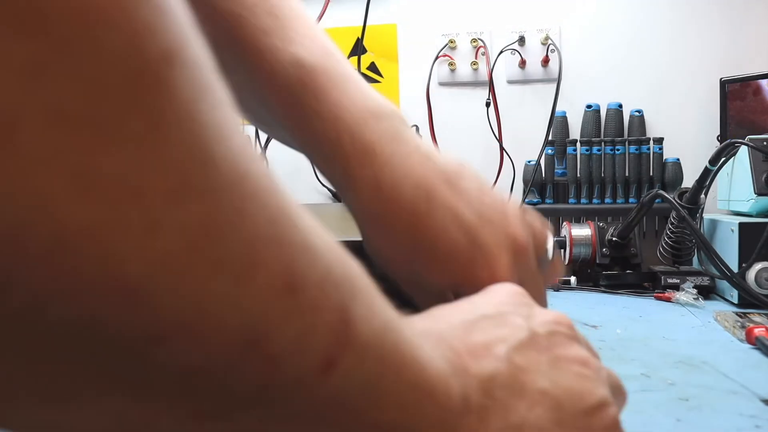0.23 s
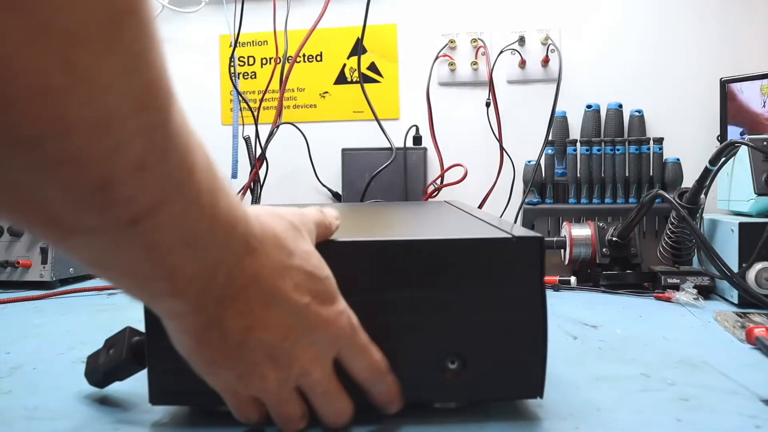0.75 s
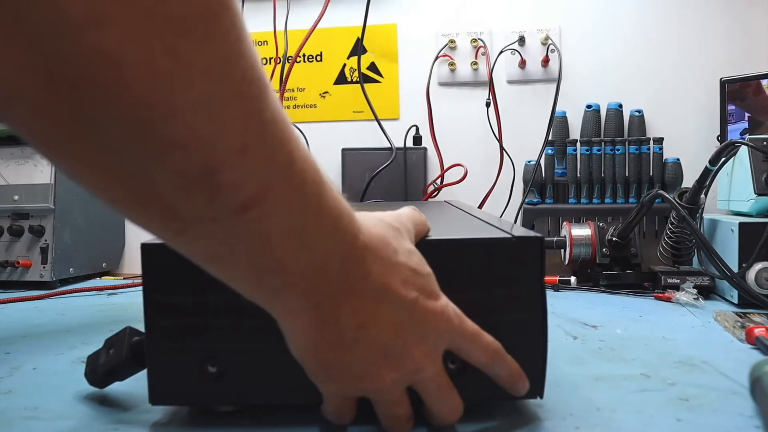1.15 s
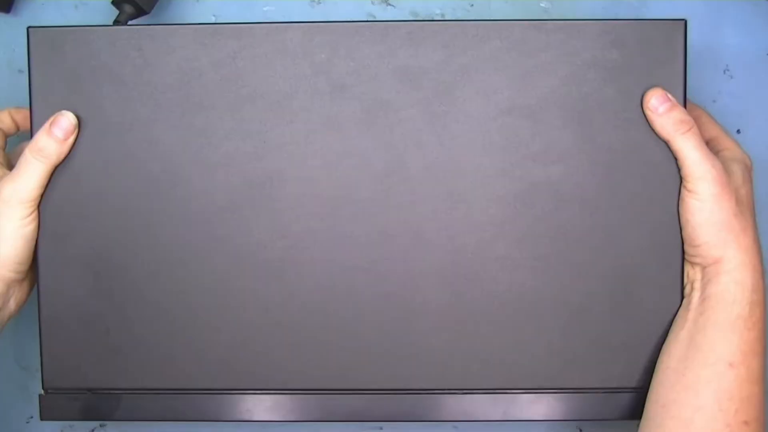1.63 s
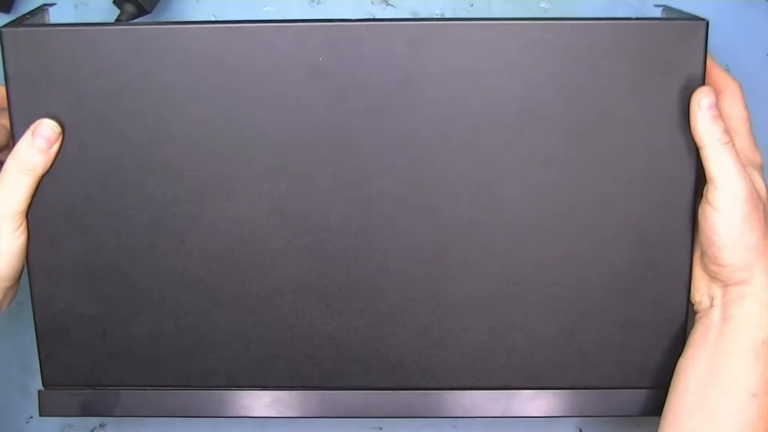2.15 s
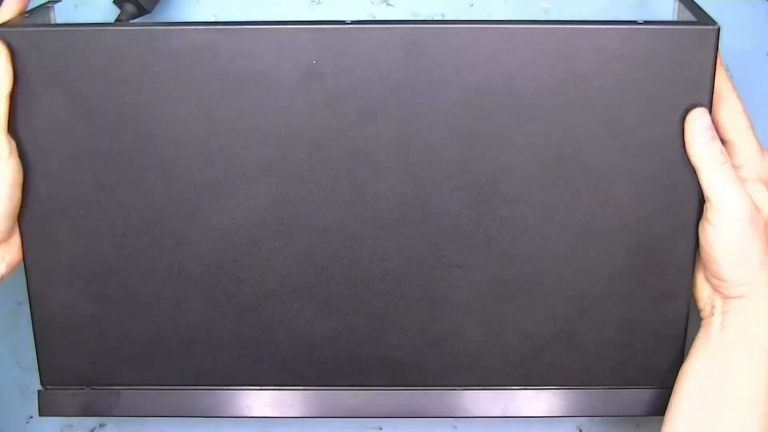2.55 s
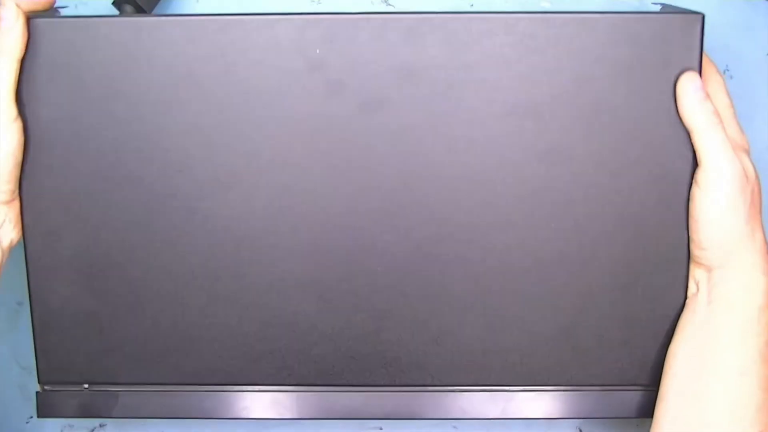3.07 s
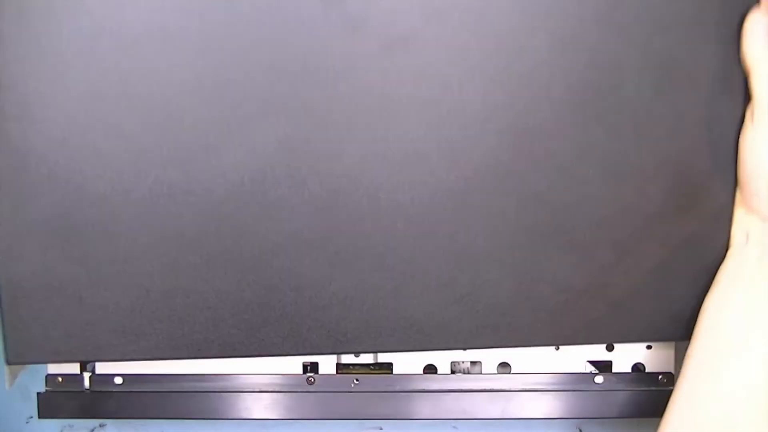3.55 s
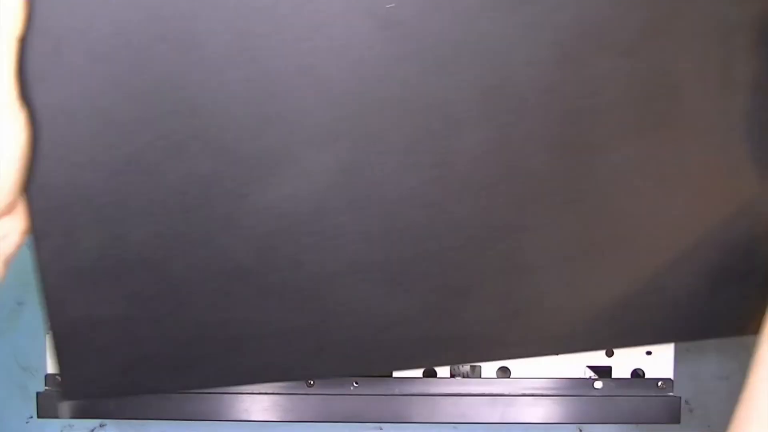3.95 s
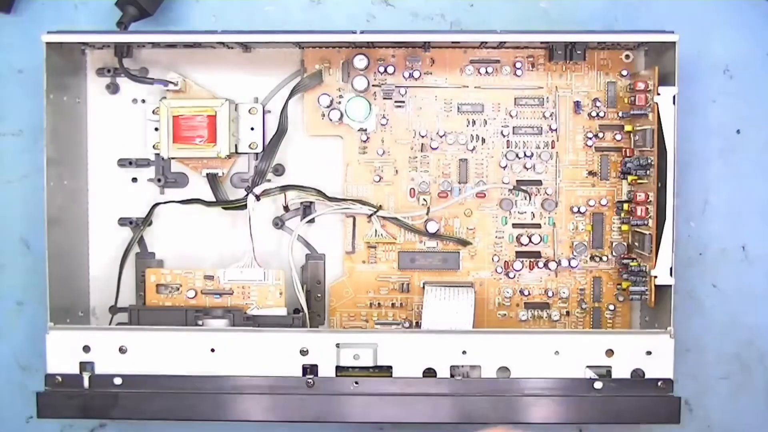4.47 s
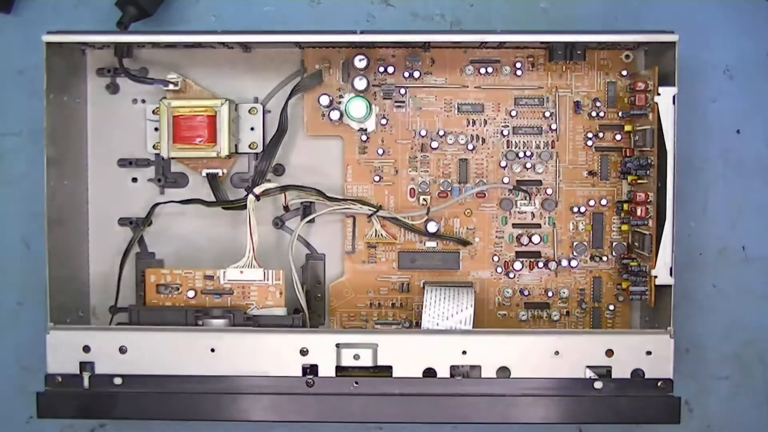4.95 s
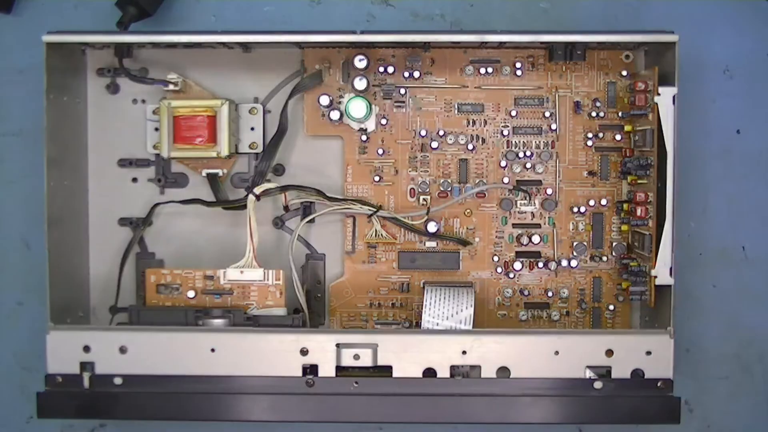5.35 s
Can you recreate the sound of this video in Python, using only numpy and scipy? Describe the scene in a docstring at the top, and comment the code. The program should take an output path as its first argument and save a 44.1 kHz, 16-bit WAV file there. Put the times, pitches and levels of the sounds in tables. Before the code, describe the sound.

A heavy metal-cased deck is dragged and knocked on a matted bench, its steel cover grates off in clangs, then lands with a clatter.

```python
"""A bench with a mat, heard close up: a cassette deck is dragged and turned, knocking as it goes.
Its steel cover grates and jerks free in clashes, is lifted away with a swish and set down with a clatter.
Rubbing is coloured noise or grit under swelling strokes, with harmonics for the judder and a gliding sine
for the zip. Blows are decaying sines over a noise wash. Hands murmur and squeak over a quiet room."""
import sys
import numpy as np
from scipy import signal
from scipy.fft import rfft, irfft, next_fast_len
from scipy.io import wavfile
from scipy.ndimage import map_coordinates

SR = 44100
rng = np.random.default_rng(int(sys.argv[2]) if len(sys.argv) > 2 else 0)


def unload_wav(signal):
    """Save mono or channel-first audio to the path in sys.argv[1] as 16-bit WAV at rate SR, clipped to [-1, 1]."""
    wavfile.write(
        sys.argv[1],
        SR,
        np.round(np.clip(np.atleast_2d(signal).T, -1, 1) * 32767).astype(np.int16),
    )


N = 247401
RING = SR * 3 // 5  # samples in one blow

# modes of the held cover, levels before trim and scatter: f/Hz, level/dB, t60/s at ring length 1
COVER_MODES = [(52, -25.5, .4), (93, 0, 0.27), (105, 7, 0.057), (112.6, 0.5, 0.61), (163, 3, 0.069),
               (175.1, -7.5, 0.47), (204, -2.5, 0.16), (298.6, 3.5, 0.51), (340.8, -4, 0.98),
               (417, 6, 0.22), (487, -3.5, 0.58), (485, -10.5, 0.083), (755, -21.5, 0.21),
               (848.6, -5.5, 0.46), (934, -7, 0.22), (1291, -26.5, 0.44), (1440, -2.5, 0.13),
               (1834, -5.5, 0.12), (2230, 5, 0.11), (2680, -3, 0.23), (3270, -17, 0.24),
               (3890, -13.5, 0.62), (4625, -17.5, 0.33), (5290, -4.5, 0.23), (5390, -2, 0.17),
               (6530, -0.5, 0.11)]
# ringing time of the steel sheet's wash at ring length 1: f/Hz, t60/s
STEEL_WASH_T60 = [(80, 0.065), (400, 0.44), (1500, 0.24), (4000, 0.11), (12000, 0.11)]
# colour of skin or cloth rubbing on the sheet: f/Hz, relative level/dB per Hz
BRUSH_TONE = [(290, -38), (500, -8), (906, -14.5), (974, -1.5), (1050, -8.5), (1670, -3), (2230, -5.5),
              (6140, -7.5), (11600, -17.5), (16000, -24)]


def amp(db):
    """Decibels to gain."""
    return 10 ** (np.asarray(db) / 20)


def unit(x):
    """Scaled to rms 1."""
    return x / np.sqrt(np.mean(x ** 2) + 1e-20)


def along(points, hz):
    """A (f/Hz, value) curve read on a log frequency axis."""
    f, value = np.transpose(points)
    return np.interp(np.log(hz + 1), np.log(f), value)


def level(rows):
    """Gain per sample from a (t/s, level/dB) curve, dropping to -140 dB after its last point."""
    return amp(np.interp(np.arange(N) / SR, *np.transpose(rows), right=-140))


def wobble(rate):
    """A smooth random curve with `rate` knots a second."""
    knots = rng.standard_normal(2000)
    return map_coordinates(knots, [np.arange(N) * rate / SR], mode="wrap")


def filtered(x, response):
    """x times a response of frequency, padded so that its tail does not wrap round."""
    m = next_fast_len(len(x) + 8192)
    spectrum = rfft(x, m) * response(np.fft.rfftfreq(m, 1 / SR))
    return irfft(spectrum, m)[:len(x)]


def coloured(x, tone):
    """x with a (f/Hz, level/dB) colour, at rms 1."""
    return unit(filtered(x, lambda hz: amp(along(tone, hz))))


def resonance(hz, centre_hz, width_hz):
    """Causal response of one mode, with a peak of 1."""
    return 1j * hz * width_hz / (centre_hz ** 2 - hz ** 2 + 1j * hz * width_hz)


def grit(rate, spread_db):
    """Tiny slips of random size at random moments, `rate` a second, under a wandering level."""
    slips = rng.random(N) < rate / SR
    return unit(slips * rng.standard_normal(N) * amp(spread_db * wobble(140)))


def strokes(rows):
    """Gain per sample of rubbing strokes that each swell to a peak and fade."""
    drop_db = 20  # swell and fade are the times taken to cover this
    roundness = 1.41  # 1 = pointed peak, 2 = bell
    t, power = np.arange(N) / SR, np.zeros(N)
    for peak_s, db, swell, fade in rows:
        away = np.minimum(np.maximum((peak_s - t) / swell, (t - peak_s) / fade), 5)
        power += amp(db - drop_db * np.abs(away) ** roundness) ** 2
    return np.sqrt(power)


def ring(modes, wash, wash_t60, modes_db, length, late_db, late_t60, free=1):
    """One blow: clear modes over a wash that dies at its own pace in each band and leaves a late ring."""
    t = np.arange(RING, dtype=np.float32) / SR
    hz, db, t60 = np.transpose(modes).astype(np.float32)[:, :, None]
    # each blow excites the modes a little differently
    strength = amp(db + modes_db + 2 * rng.standard_normal(hz.shape)).ravel()
    decay = np.exp(-t * np.float32(np.log(1000) / (length * free)) / t60)
    clear = strength @ (decay * np.sin(2 * np.pi * hz * t))
    noise = coloured(rng.standard_normal(RING), wash)
    f, s, z = signal.stft(noise, SR, nperseg=256)
    early = amp(-60 * s / (length * along(wash_t60, f)[:, None]))
    late = amp(late_db - 60 * s / (late_t60 * free))
    return clear + signal.istft(z * (early + late), SR, nperseg=256)[1][:RING]


def blows(rows, voice, rise, thump_db, body_db, bright_db):
    """Each contact drives the low, middle and high bands at levels of its own."""
    out, t = np.zeros(N + SR), np.arange(RING) / SR
    edges = [(180, "low"), ((180, 1000), "band"), (1000, "high")]  # Hz
    bands = [signal.butter(3, edge, kind, fs=SR, output="sos") for edge, kind in edges]
    for s, bright, thump, body, length in rows:
        build_up = 1 - np.exp(-t / max(rise(bright), 1e-4))
        blow = voice(s, max(length, .2)) * build_up
        levels = (thump + thump_db, body + body_db, bright + bright_db)
        for band, db in zip(bands, levels):
            part = signal.sosfilt(band, blow)
            # the level is that of the first 25 ms
            out[round(s * SR):][:RING] += amp(db) * part / np.std(part[:SR // 40])
    return out[:N]


def handling():
    """Hands on the case excite a low, wavering murmur of the panels, over steady room noise."""
    # how hard the hands work the case: t/s, murmur level/dB before its waver
    grip = [(0, -56), (.65, -64.5), (1.5, -61.5), (1.78, -46), (2.45, -50), (2.75, -46), (3.6, -56.5),
            (4, -78.5)]
    # colour of the room: f/Hz, relative level/dB per Hz
    room_tone = [(29, -36.5), (50, 2.5), (661, -9), (884, -6.5), (973, -14.5), (1960, -19), (2810, -15.5),
                 (3250, -20), (12300, -34.5), (13800, -34.5), (16000, -36.5)]
    murmur_tone = [(30, -14), (60, -10.5), (110, -9.5), (200, -18.5), (300, -9.5), (500, -20.0),
                   (900, -33.5), (3000, -42.5), (7000, -51.0), (15000, -61.5)]
    murmur = level(grip) * amp(2.2 * wobble(22)) * coloured(rng.standard_normal(N), murmur_tone)
    room = amp(-67) * coloured(rng.standard_normal(N), room_tone)
    return murmur + room


def drag():
    """Pushes over the mat: stick-slip gives a harmonic squeak, fine slips a hiss, the grain a sinking zip."""
    # judder, hiss (before trim) and zip strokes: peak t/s, level/dB, swell/s, fade/s
    judder = [(.01, -32.5, .1, .055), (.095, -35, .075, .09)]
    hiss_strokes = [(.02, -40, .1, .15), (.165, -36, .22, .06), (.245, -41.5, .1, .055),
                    (.32, -60, .05, .05)]
    zip_strokes = [(.228, -48, .045, .045)]
    # overtones of the judder: multiple, relative level/dB
    judder_tone = [(1, -7.5), (2, -14), (3, 3), (4, -14), (5, -10.5), (6, -2.5), (7, -16.5), (8, -3.5),
                   (9, -9), (10, -9), (11, -12), (12, -5.5), (13, -5.5), (14, -1.5), (15, -6), (16, -6.5),
                   (17, -15), (18, -15), (19, -14.5), (20, -10), (21, -10), (22, -22.5), (23, -22),
                   (24, -18.5)]
    # colour of the hiss: f/Hz, relative level/dB per Hz
    hiss_tone = [(25, -48), (60, -38), (150, 5), (300, 0), (600, 3.5), (1000, 3), (1600, 4), (2600, -2),
                 (4500, -0.5), (6500, -6), (8500, -15), (13000, -19), (16000, -34.5)]
    slip_hz = 276  # mean slips a second
    zip_peak_hz, zip_sag = 1180, 12000  # Hz at the stroke's peak, Hz per s

    cycles = np.cumsum(slip_hz * (1 + 0.004 * wobble(120))) / SR
    squeak = np.zeros(N)
    for k, db in judder_tone:
        flicker = amp(db + 2.5 * wobble(40))
        squeak += flicker * np.sin(2 * np.pi * (k * cycles + rng.random()))
    squeak = unit(squeak)
    hiss = coloured(grit(rate=22000, spread_db=0), hiss_tone)
    # the pitch sinks as the push slows
    zip_hz = np.maximum(zip_peak_hz - zip_sag * (np.arange(N) / SR - zip_strokes[0][0]), 0)
    rasp = np.sqrt(2) * np.sin(2 * np.pi * np.cumsum(zip_hz * (1 + .08 * wobble(400))) / SR)
    return strokes(judder) * squeak + strokes(zip_strokes) * rasp + amp(-0.5) * strokes(hiss_strokes) * hiss


def bumps():
    """Knocks of the deck and hands on the bench: short modes and wash, damped by the mat."""
    # knocks, levels before trim: t/s, click level/dB, thump level/dB, knock level/dB
    knocks = [(0.146, -33.5, -41.5, -20.5), (0.1651, -32, -42, -20), (0.3425, -53, -57, -35.5),
              (0.3862, -25, -23.5, -19), (0.4009, -12, -36.5, -12.5), (0.418, -16.5, -27.5, -23.5),
              (0.4314, -41.5, -28.5, -39), (0.8838, -51, -50, -52.5), (0.926, -43, -49, -67),
              (1.103, -34.5, -40, -32.5), (1.1597, -40.5, -42, -21.5), (1.204, -24.5, -23.5, -19),
              (1.2254, -8.5, -24, -13), (1.2659, -34.5, -49, -41), (1.423, -43.5, -64, -48.5),
              (1.6236, -39.5, -74, -53), (1.6877, -51.5, -49, -42), (1.721, -26.5, -34, -25.5),
              (4.6582, -46, -72, -47), (5.01, -50, -57.5, -56)]
    # modes of the deck on the bench, before trim and scatter: f/Hz, level/dB, t60/s at ring length 1
    bench_modes = [(100.6, 1.5, 0.12), (119, -9, 0.31), (178.3, 2.5, 0.079), (288, 4.5, 0.1),
                   (327.4, 2, 0.13), (514.6, -3, 0.081), (664, -17, 0.064), (887, -13.5, 0.078)]
    # dense higher modes: f/Hz, relative level/dB per Hz
    bench_wash = [(41, -41), (70, -22), (268, -2.5), (664, -1.5), (744, -6), (872, -2.5), (1050, -15.5),
                  (1760, -12.5), (1930, -14), (2220, -12), (2720, -12.5), (7060, -19.5), (16000, -52)]
    # their ringing time at ring length 1: f/Hz, t60/s
    bench_t60 = [(80, 0.06), (400, 0.15), (1500, 0.077), (10000, 0.077)]
    # slow build-up, then fast build-up with the click it must exceed: click level/dB, rise/s
    mat_rise = [(-21, 0.015), (-33.5, .0018)]
    (_, slow_s), (threshold_db, fast_s) = mat_rise
    mat_length = 0.73  # ring length factor on the damping mat

    def voice(s, length):
        return ring(bench_modes, bench_wash, bench_t60, modes_db=-0.5, length=length,
                    late_db=-53, late_t60=0.15)

    def rise(click_db):
        return fast_s if click_db > threshold_db else slow_s

    rows = [(*row, mat_length) for row in knocks]
    return blows(rows, voice, rise, thump_db=-5.5, body_db=-6.5, bright_db=-18.0)


def fingers():
    """Dry skin slips in fine grit on the painted steel; wavering sines make four faint squeaks."""
    # slides into a new grip, before trim: peak t/s, level/dB, swell/s, fade/s
    slides = [(.635, -67, .018, 0.073), (.725, -56, .025, .1), (.8, -63.5, .025, 0.074),
              (.955, -56.5, .035, 0.077), (1.08, -61, .025, 0.069), (1.535, -73, .03, .03),
              (1.66, -65, 0.027, 0.081), (5.2, -70.5, 0.18, .3)]
    # fingertip squeaks: middle t/s, half length/s, f/Hz, peak level/dB
    squeak_rows = [(4.27, .03, 2800, -60), (4.335, .03, 1170, -62), (4.41, .04, 1000, -61),
                   (4.81, .05, 1750, -63)]
    t = np.arange(N) / SR
    waver = np.cumsum(1 + 0.0132 * wobble(200)) / SR  # time that runs unevenly bends the pitch
    squeaks = np.zeros(N)
    for s, half, hz, db in squeak_rows:
        squeaks += amp(db) * np.exp(-((t - s) / half) ** 2) * np.sin(2 * np.pi * hz * waver)
    skin = coloured(grit(rate=12000, spread_db=4), BRUSH_TONE)
    return squeaks + amp(-1.5) * strokes(slides) * skin


def turn():
    """The feet hiss over the mat as the deck is swung round; one resonance of the case sings along."""
    # swings, before trim: peak t/s, level/dB, swell/s, fade/s
    swings = [(1.165, -36, 0.052, 0.081), (1.24, -33.5, 0.09, 0.049), (1.455, -49, 0.028, 0.032),
              (1.498, -40, 0.079, 0.0099)]
    # colour of the rub: f/Hz, relative level/dB per Hz
    turn_tone = [(59, -40), (100, -11), (234, -2), (502, -17.5), (950, -11), (1760, -5.5), (1950, -2.5),
                 (2170, -10.5), (3190, -20), (5080, -15), (8110, -16), (11900, -27), (16000, -40)]
    rub = coloured(grit(rate=34000, spread_db=3.0), turn_tone)
    rub = unit(filtered(rub, lambda hz: 1 + amp(-10) * resonance(hz, centre_hz=1944, width_hz=100)))
    return amp(0.5) * strokes(swings) * rub


def smeared(x, t60):
    """x spread by the countless short-lived modes of a sheet; they change as the contact travels."""
    hop = SR // 25
    t, out = np.arange(SR // 10) / SR, np.zeros(N + SR)
    fade = signal.get_window("hann", 2 * hop)
    for start in range(0, N - 2 * hop, hop):
        tail = rng.standard_normal(len(t)) * amp(-60 * t / t60)
        grain = x[start:start + 2 * hop] * np.sqrt(fade)
        piece = signal.fftconvolve(grain, tail / np.linalg.norm(tail))
        out[start:start + len(piece)] += piece
    return out[:N]


def scrape():
    """Steel grates on steel, and every slip feeds the modes of the hand-damped cover."""
    # tugs along the chassis, before waver and trim: peak t/s, level/dB, swell/s, fade/s
    tugs = [(1.778, -26.5, .045, 0.065), (1.86, -41.5, .06, .025), (1.95, -36.5, 0.1, .1),
            (2.07, -37.5, .13, .14), (2.18, -32, 0.068, .06), (2.277, -34, 0.07, 0.024),
            (2.57, -57, 0.16, .12), (2.675, -32, .065, .08), (2.99, -32.5, 0.066, 0.11),
            (3.11, -26.5, 0.098, .19), (3.25, -32.5, 0.21, 0.15), (3.41, -23, .055, .08),
            (3.62, -53, .05, 0.049), (3.722, -38, .015, 0.028)]
    # colour of the grating: f/Hz, relative level/dB per Hz
    scrape_tone = [(35, -31), (60, -7), (118, -3.5), (227, -10.5), (315, -2.5), (492, 8.5), (593, -7.5),
                   (822, 2.5), (1200, -3), (1780, 3.5), (2140, 1.5), (6000, -7), (12100, -25), (16000, -32)]
    pressure = strokes(tugs) * amp(1.1 * wobble(32))
    rub = smeared(pressure * coloured(grit(rate=2500, spread_db=1), scrape_tone), t60=0.059)
    t, held = np.arange(RING) / SR, .45  # the hands shorten the ringing by this factor
    panel = np.zeros(RING)
    for hz, _, t60 in COVER_MODES:
        even_gain = 2 * np.log(1000) / (held * t60 * SR)  # about the same peak response for every mode
        panel += amp(-60 * t / (held * t60)) * np.cos(2 * np.pi * hz * t) * even_gain
    return amp(0.5) * rub + amp(-10.0) * signal.fftconvolve(rub, panel)[:N]


def jolts():
    """The cover catches and snaps past the chassis: panel modes boom under a clashing steel wash."""
    # catches, levels before trim: t/s, clash level/dB, thump level/dB, panel level/dB, ring length factor
    catches = [(1.7808, -20, -10.5, -26.5, 0.46), (1.8197, -32.5, -21.5, -23.5, 0.37),
               (1.8994, -54.5, -55, -30, 1.0), (2.0413, -41.5, -29, -36.5, 0.85),
               (2.1048, 3, -15, -11.5, 0.98), (2.295, -51, -32, -64, 0.89), (2.4236, -53, -35.5, -49, .7),
               (2.6946, -27.5, -58, -24.5, 0.53), (2.7103, -35.5, -30.5, -22.5, 0.49),
               (2.8437, -40.5, -47, -68, 0.48), (2.9525, -12, -13.5, -24.5, .9),
               (2.9781, -7.5, -30.5, -21.5, 1), (3.0722, -7, -44.5, -19.5, 0.82),
               (3.1757, -13, -27.5, -22.5, 0.6), (3.2549, -28, -38, -34.5, 0.78),
               (3.4318, 2.5, -25, -19, 0.94), (3.4663, -45, -24.5, -25.5, 1.0), (3.6526, -31, -40, -42, 1),
               (3.7178, -24.5, -37.5, -28.5, 0.48), (4.0434, -43, -66.5, -58, 0.6)]
    # dense higher modes of the held cover: f/Hz, relative level/dB per Hz
    cover_wash = [(21, -33.5), (35, -1), (103, -3.5), (252, -6), (431, -4), (667, -12.5), (739, -11.5),
                  (979, -16), (1810, -13), (2010, -14), (3530, -13), (4010, -8.5), (10600, -22.5),
                  (13400, -30), (16000, -41.5)]
    # ringing first shortens, then lengthens as the cover comes clear: t/s, factor on modes and late ring
    freedom = [(2.1, 0.87), (3.45, 0.55), (3.7, 1.26)]
    # the harder steel meets steel, the faster the build-up: clash level/dB, rise/s
    catch_rise = [(-20, 0.0048), (3, .0008)]

    def voice(s, length):
        free = np.interp(s, *np.transpose(freedom))
        return ring(COVER_MODES, cover_wash, STEEL_WASH_T60, modes_db=-11, length=length,
                    late_db=-21, late_t60=0.53, free=free)

    def rise(clash_db):
        return np.interp(clash_db, *np.transpose(catch_rise))

    return blows(catches, voice, rise, thump_db=-2.5, body_db=-5.0, bright_db=-16.0)


def mirrored(x, share, start_s, gap_m, m_per_s):
    """x with three echoes from a gap that widens at a steady speed; soft skin swallows their treble."""
    at, sound_m_per_s = np.arange(N), 343
    gap = gap_m + m_per_s * np.maximum(at / SR - start_s, 0)
    delay = 2 * gap / sound_m_per_s * SR  # samples there and back
    dull = filtered(x, lambda hz: 1 / (1 + (hz / 2600) ** 2))
    echoes = np.zeros(N)
    for k in range(1, 4):
        echoes += min(share, .9) ** k * map_coordinates(dull, [at - k * delay], order=1)
    return unit(x + echoes)


def lift():
    """The cover brushes past arm and clothes in gritty noise while the thin sheet flexes in low noise."""
    # brushes past the body and flexes of the sheet, before trim: peak t/s, level/dB, swell/s, fade/s
    brushes = [(4.085, -78, 0.0404, 0.29), (4.265, -50, 0.3, 0.18), (4.48, -54, .2, 0.24),
               (4.572, -47.5, 0.12, .1), (4.69, -55, 0.15, 0.21), (4.825, -54, 0.22, .17),
               (4.98, -64.5, 0.095, 0.11)]
    flexes = [(4.27, -51, 0.23, .4), (4.74, -63, 0.17, 0.25), (5.0, -57, 0.203, 0.041)]
    # colour of the flexing: f/Hz, relative level/dB per Hz
    flex_tone = [(18, -37), (30, -1.5), (79, -2), (108, -18), (140, -2.5), (253, -16), (341, -13),
                 (600, -17.5), (780, -52), (1320, -120)]
    brush = strokes(brushes)
    rub = coloured(grit(rate=2900, spread_db=-1.7), BRUSH_TONE)
    swish = brush * mirrored(rub, share=0.287, start_s=4.1, gap_m=.11, m_per_s=.17)
    flex = strokes(flexes) * coloured(rng.standard_normal(N), flex_tone)
    # the faster the stroke, the brighter its hiss
    speed = brush / brush.max()
    bright_tone = [(2000, -25.5), (4200, -2), (6500, -2), (14000, -19.5)]
    bright = speed * brush * coloured(rng.standard_normal(N), bright_tone)
    return amp(-2.0) * swish + amp(5.0) * bright + amp(-1.5) * flex


def landing():
    """The free cover touches down, lands and rocks: a quick clatter of blows on its loose modes."""
    # contacts, levels before trim: t/s, clash level/dB, thump level/dB, panel level/dB, length factor
    contacts = [(5.492, -52.5, -59, -38.5, .8), (5.51, -5.5, -43.5, -12.5, 0.37),
                (5.5236, -6, -35, -11.5, 0.91), (5.5574, -9, -29, -45, 0.78), (5.5824, -7.5, -40, -15, 1),
                (5.5941, -4.5, -37.5, -14, 0.92)]
    # modes of the loose cover, before trim and scatter: f/Hz, level/dB, t60/s at ring length 1
    loose_modes = [(357, -2.5, 0.22), (454, -4, 0.6), (476, 7.5, 0.33), (530, -61, 0.595), (741, 1.5, 0.18),
                   (990, -12.5, .2), (1369, -13, 0.068), (1780, -11, 0.36), (3290, -8.5, 0.1)]
    # dense higher modes: f/Hz, relative level/dB per Hz
    loose_wash = [(29, -39), (50, -17.5), (116, -8), (306, -40.5), (483, 5), (559, -18), (1100, -12),
                  (1620, -16), (2060, -18.5), (2680, -19.5), (4560, -16.5), (10100, -35), (16000, -51)]

    def voice(s, length):
        return ring(loose_modes, loose_wash, STEEL_WASH_T60, modes_db=-5.5, length=0.58 * length,
                    late_db=-18.0, late_t60=0.29)

    def rise(clash_db):
        return 0.0035  # s, the same for every blow

    return blows(contacts, voice, rise, thump_db=-6.0, body_db=-2.0, bright_db=-13)


def scene():
    """All sources summed to one microphone that feeds both channels."""
    mono = handling() + drag() + bumps() + fingers() + turn() + scrape() + jolts() + lift() + landing()
    return np.array([mono, mono])


def record(dry):
    """The microphone thins the deepest bass, rounds peaks off near full scale, then cuts the top band."""
    top_hz = 16100
    thin = signal.sosfilt(signal.butter(3, 38, "high", fs=SR, output="sos"), dry)
    held = thin / (1 + np.abs(thin) ** 6) ** (1 / 6)
    return np.array([filtered(channel, lambda hz: hz < top_hz) for channel in held])


dry = scene()
out = record(dry)
unload_wav(out)
```